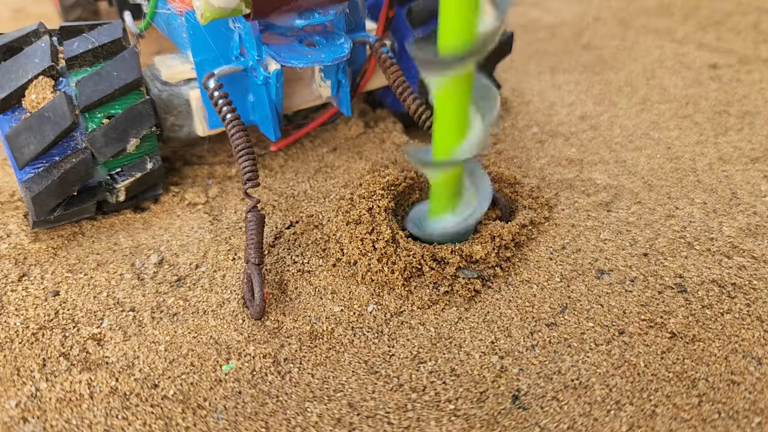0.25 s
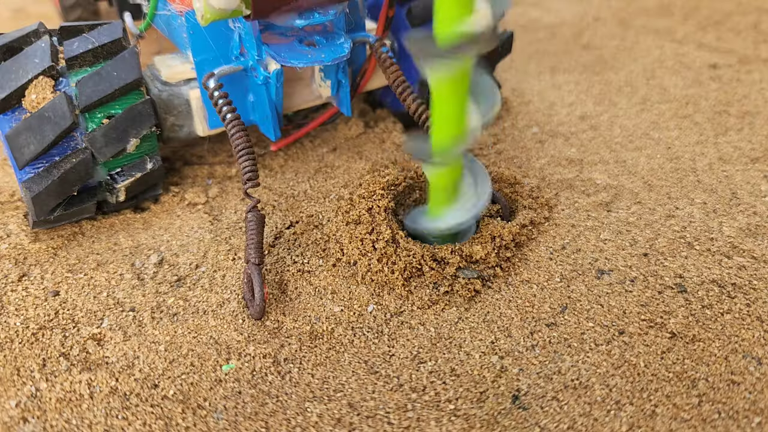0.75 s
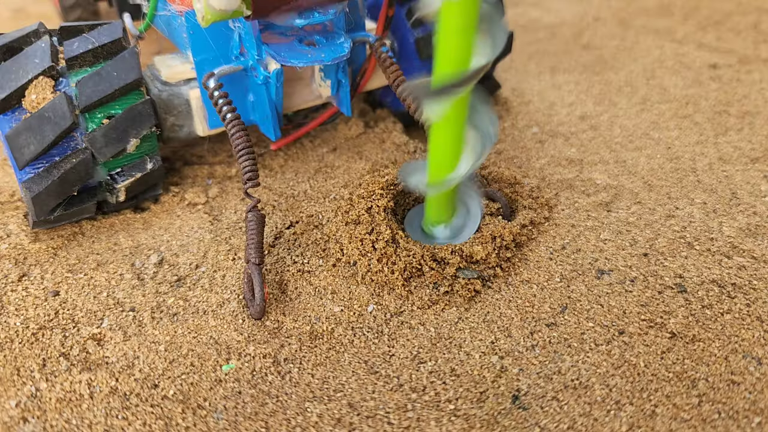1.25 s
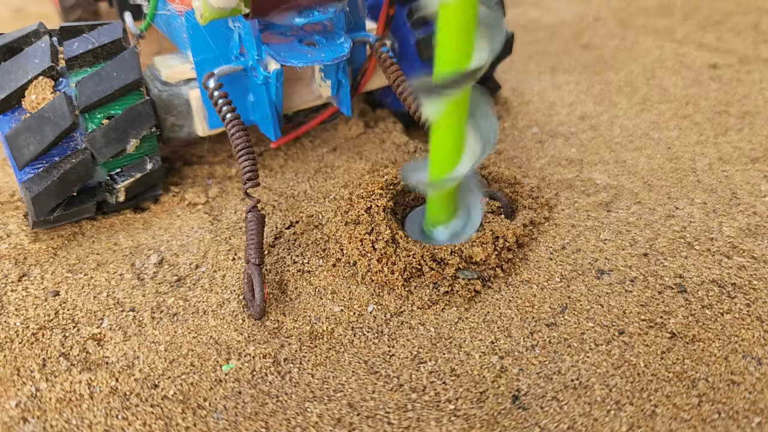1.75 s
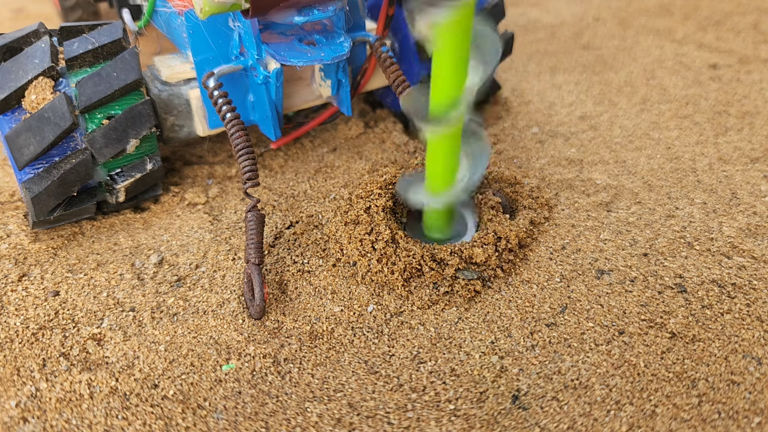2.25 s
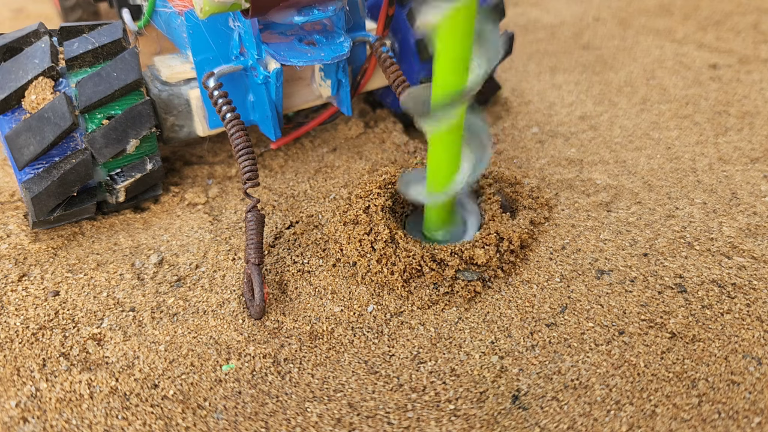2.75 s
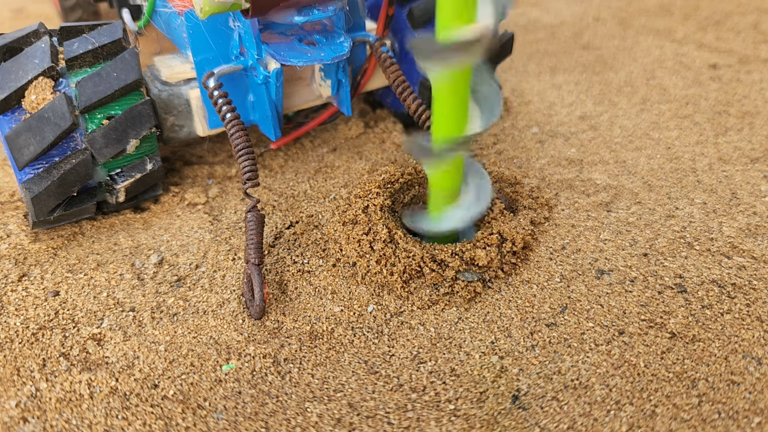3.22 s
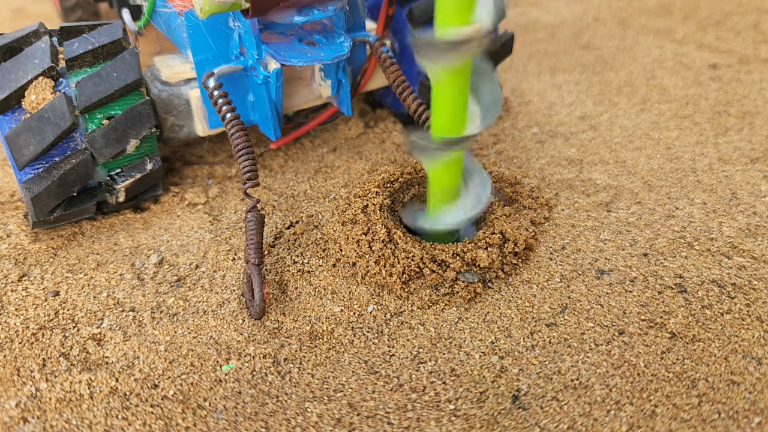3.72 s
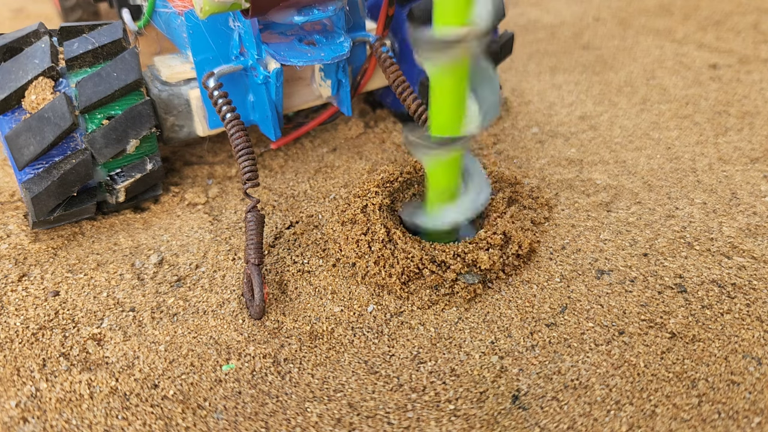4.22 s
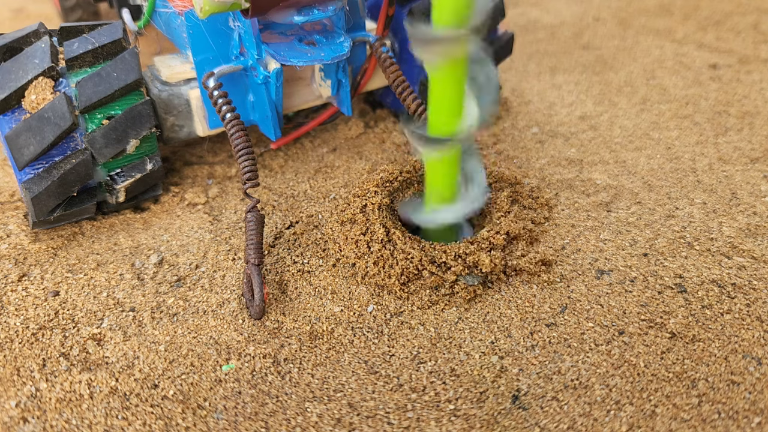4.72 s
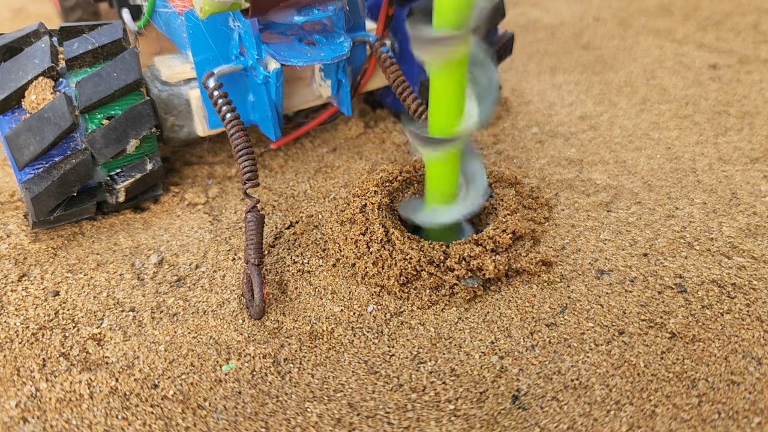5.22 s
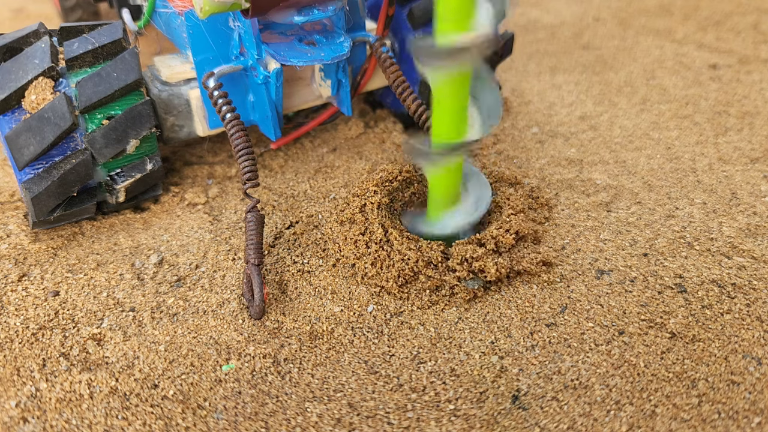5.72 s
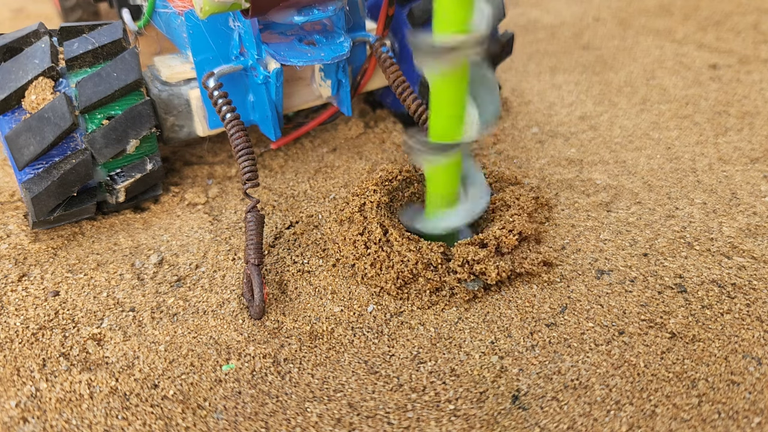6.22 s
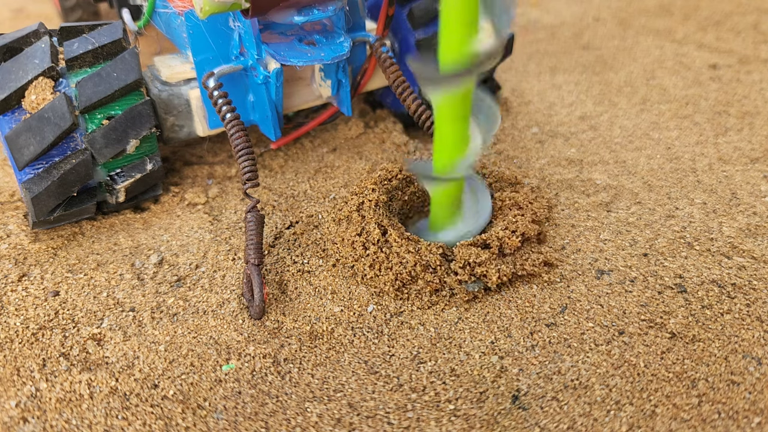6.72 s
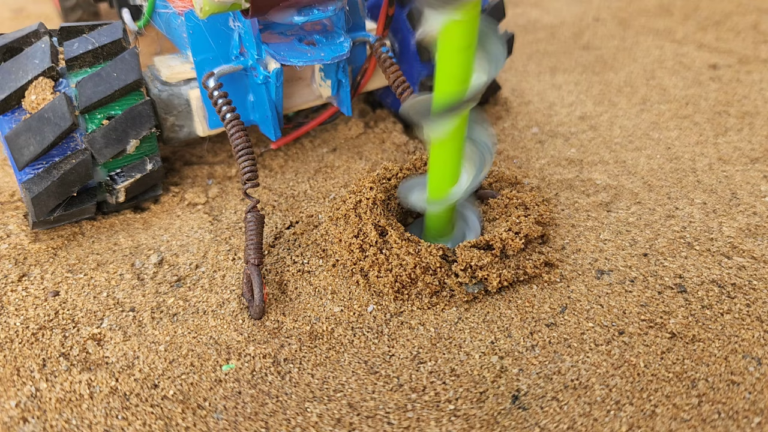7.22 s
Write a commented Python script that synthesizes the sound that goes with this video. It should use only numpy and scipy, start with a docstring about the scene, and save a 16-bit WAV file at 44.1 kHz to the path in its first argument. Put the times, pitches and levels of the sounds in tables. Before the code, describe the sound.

Close up, a little geared motor buzzes and clatters without pause as a toy auger bores into sand.

```python
"""In dry sand, close by, a toy's small DC gear motor turns a plastic auger, slowing a little as it digs. On
every turn of the rotor the loose gears knock into the plastic chassis and excite its modes, and the brushes
scratch and now and then snap with a bright spark; now and then a tooth catches with a clack. The unbalanced
rotor hums underneath, the teeth whine faintly and the frame shudders. Sand crumbles and scrapes round the bit."""
import sys
import numpy as np
from scipy import signal
from scipy.fft import rfft, irfft, next_fast_len
from scipy.io import wavfile

SR = 44100
rng = np.random.default_rng(int(sys.argv[2]) if len(sys.argv) > 2 else 0)


def wav_record(signal):
    """Record a signal, one row per channel, as 16-bit PCM in the file named by sys.argv[1]."""
    frames = np.transpose(np.atleast_2d(signal))
    bounded = np.clip(frames, -1, 1)
    # unit amplitude maps onto the largest positive 16-bit level
    quanta = np.round(bounded * 32767).astype(np.int16)
    wavfile.write(sys.argv[1], SR, quanta)


N = 328986
TIME = np.arange(N) / SR
SECOND_GEAR_RATIO = 7 / 11   # turns of the second gear per rotor turn


def gears(turns, level_db, unevenness, ear_unevenness):
    """Modal superposition: each knock rings the plastic's modes; soft contacts barely reach high ones."""
    # Chassis modes, struck directly. Each row: frequency in Hz, bandwidth in Hz, relative level in dB,
    # left-right difference in dB.
    chassis_modes = [(425, 370, -35.5, 10), (521, 69, -11, 1), (989, 97, -8, 5), (1105, 150, -13, -5),
                     (1404, 127, 0.5, 1.5), (1500, 215, -9, -1.9), (1730, 220, -7, 2),
                     (1851, 144, 0.66, -3), (2073, 80, -7, -8), (3916, 530, -8, 0), (4700, 1080, -10, -1)]
    # Gearbox shell modes, with the same columns; two resonators in series make each swell a moment later.
    shell_modes = [(2485, 370, 2, 5), (2767, 217, 5, -1), (3130, 270, -4.5, 5.5), (3260, 236, -5.5, -9.5)]
    # Antiresonances, where neighbouring modes cancel. Each row: frequency in Hz, width in Hz, depth 0-1.
    antiresonances = [(729, 165, 0.89), (1270, 220, 0.11), (2262, 82, 0.07), (3530, 150, 0)]
    times, sizes, hardness_hz = knocks(turns, rebound_db=-6.0, rebound_s=0.001321)
    body = 0
    for k, (hz, width, db, side_db) in enumerate(chassis_modes + shell_modes):
        chance = rng.standard_normal((len(times), 3)).T
        # the point of contact changes, and with it how each mode is struck and where it radiates
        variety = 1 + unevenness * chance[0] + ear_unevenness * hz / 2000 * chance[1:]
        strengths = sizes * variety / np.sqrt(1 + (hz / hardness_hz) ** 6)
        ring = resonate(np.array([impulses(times, ear) for ear in strengths]), hz, width)
        if k >= len(chassis_modes):
            ring = resonate(ring, hz, width)
        polarity = (-1) ** (k // 2)
        body = body + polarity * from_db(db) * pan(side_db) * ring
    for hz, width, depth in antiresonances:
        body = body - depth * resonate(body, hz, width)
    return from_db(level_db) * body


def knocks(turns, rebound_db, rebound_s):
    """Backlash: loose teeth hit either flank and rebound once. Gives times, sizes and hardness in Hz."""
    # Tooth contacts within a turn. Each row: place in the turn 0-1, relative strength in dB,
    # strength spread in dB, timing spread in ms, hardness as a cutoff in Hz.
    contacts = [(.115, -10, 3.5, 0.24, 2200), (.225, -14.5, 5, 0.31, 2180), (.265, -7.5, 1, .15, 4500),
                (0.306, -8.5, 0, 0.27, 5000), (.395, -14, 4, 0.494, 2620), (.479, -15, 0.5, 0.297, 8000),
                (.64, -12, 2.5, 0.372, 3500), (.69, -2.5, 2.9, 0.249, 4200), (.75, -2, 1.6, .25, 4200),
                (.81, -11.5, 2, 0.292, 3000), (.87, 1, 1.2, .14, 1780), (.975, -6, 1, 0.13, 1620)]
    catch_s, catch_sizes = catches(turns, share=.2, catch_db=.5, clack_db=20.5)
    groups = [(catch_s, catch_sizes, np.full(len(catch_s), 4130))]   # hardness of a catch in Hz
    for place, db, spread_db, spread_ms, hardness_hz in contacts:
        times, sizes = each_turn(turns, place, spread_db, spread_ms, gear_db=0.4)
        # a caught tooth skips its ordinary contacts
        free = (catch_sizes == 0) | (times < catch_s - .0024) | (times > catch_s + .0012)
        groups.append((times, free * sizes * from_db(db), np.full(len(times), hardness_hz)))
    times, sizes, hardness = np.hstack(groups)
    rebounds = times + rebound_s * rng.uniform(.3, 1.679, len(times))
    flank = rng.choice([-1, 1], 2 * len(times))
    return np.r_[times, rebounds], flank * np.r_[sizes, sizes * from_db(rebound_db)], np.tile(hardness, 2)


def catches(turns, share, catch_db, clack_db):
    """Stick and release: a tooth catches and lets go hard, on random turns and at the listed clacks."""
    # Catches that stand out as clacks. Each row: time in seconds, relative level in dB.
    clacks = [(0.3341, -15), (0.4772, -16), (0.584, -14), (0.617, -20), (0.8337, -16), (0.8697, -17),
              (1.1209, -17), (1.2637, -21), (1.4262, -16), (1.5507, -14), (1.5873, -14.5), (1.784, -16),
              (1.8202, -16), (1.927, -17), (2.5731, -13.5), (2.6263, -17.5), (3.021, -16.5),
              (3.3619, -16.5), (3.47, -15.5), (3.5766, -17.5), (3.686, -14), (3.7766, -15.5), (3.8638, -16),
              (4.17, -15), (4.4039, -16.5), (4.817, -18), (4.9603, -15), (5.015, -16), (5.1424, -18),
              (5.232, -14.5), (5.25, -19), (5.9528, -16.5), (6.0072, -17), (6.1511, -15), (6.186, -17.5),
              (6.206, -14.5), (6.2614, -17), (6.566, -16), (6.873, -15.5), (6.9817, -17), (7.434, -15)]
    times, sizes = each_turn(turns, place=.715, spread_db=1, spread_ms=0.343, gear_db=-0.9)
    caught = rng.random(len(times)) < share
    sizes = caught * sizes * from_db(catch_db)
    clack_s, db = np.transpose(clacks)
    nearest = np.abs(times[:, None] - clack_s).argmin(axis=0)   # a clack is the catch of its turn
    times[nearest], sizes[nearest] = clack_s, from_db(db + clack_db)
    return times, sizes


def each_turn(turns, place, spread_db, spread_ms, gear_db):
    """Eccentricity: the second gear presses a once-a-turn contact harder and softer. Gives times, sizes."""
    at = np.arange(int(turns[-1])) + place
    timing, strength = rng.standard_normal((len(at), 2)).T
    pressure = np.sin(2 * np.pi * SECOND_GEAR_RATIO * at)
    times = np.interp(at, turns, TIME) + spread_ms * timing / 1000
    return times, from_db(spread_db * np.clip(strength, -2, 1.7) + gear_db * pressure)


def brushes(turns, level_db, floor_db, sparks_per_s, spark_db, spark_spread_db):
    """Sliding friction: brushes cross the commutator gaps in decaying noise bursts, with tiny sparks."""
    # Scratches within a turn. Each row: place in the turn 0-1, relative level in dB, decay time in ms,
    # strength spread in dB, timing spread in ms.
    scratches = [(.195, -12.5, 6, 10.5, 0.4), (.258, 1, 0.74, 5.5, 0.18), (.31, -4, 5, 5, 0.32),
                 (0.459, 0.5, 5.5, 4, 0.25), (.52, -4.5, 3.6, 3.5, 0.4), (0.69, -3.5, 3.4, 3, 0.4)]
    # Spectrum of the brush noise. Each row: frequency in Hz, relative spectral density in dB.
    spectrum = [(100, -34), (2000, -23), (3800, -3), (4650, 4), (6000, -0.5), (7500, -4.5), (8600, 2.5),
                (9400, -2.5), (10300, -3.5), (11500, 0), (13300, 2), (15400, -0.5), (15900, -22)]
    power = from_db(floor_db) ** 2
    for place, db, decay_ms, spread_db, spread_ms in scratches:
        times, sizes = each_turn(turns, place, spread_db, spread_ms, gear_db=1.5)
        retention = np.exp(-2000 / (decay_ms * SR))   # power decays twice as fast as amplitude
        power = power + signal.lfilter([1], [1, -retention], impulses(times, (sizes * from_db(db)) ** 2))
    sizes = rng.choice([-1, 1], N) * from_db(spark_spread_db * np.minimum(rng.standard_normal(N), 2))
    sparks = (rng.random(N) < sparks_per_s / SR) * sizes * (1 + 1.26 * rng.standard_normal((2, N)))
    crackle = from_db(spark_db) * rms_one(highpass(sparks, hz=10500))
    friction = rng.standard_normal((2, N))
    return from_db(level_db) * pan(1.8) * colour(np.sqrt(power) * (friction + crackle), spectrum)


def rotor_hum(turns, place, lead, flutter, wobble):
    """Forced vibration: the unbalanced rotor pushes the frame slowly, then thumps it, once a turn."""
    # Harmonics of the rotation. Each row: multiple of the turn rate, level in dB.
    harmonics = [(2, -66), (3, -49), (4, -53), (5, -60), (6, -65), (7, -47.8), (8, -54.5), (9, -54.5),
                 (10, -56), (11, -57.5), (12, -63), (13, -62), (14, -63), (15, -67), (16, -60), (17, -52),
                 (18, -52.5), (19, -56), (20, -53.5), (24, -55), (25, -46.5), (26, -56), (27, -53),
                 (28, -53), (30, -50), (34, -53)]
    load = np.sin(2 * np.pi * SECOND_GEAR_RATIO * turns) + 0.19 * drift(48)
    hum = 0
    for order, db in harmonics:
        looseness = np.clip((order - 4) / 10, .05, 1)   # high orders follow the gear load most
        waver = 1 + looseness * (wobble * load + flutter * drift(25))
        cycles = order * (turns - place) - lead / order   # low orders come early in the turn
        hum = hum + from_db(db) * waver * np.cos(2 * np.pi * cycles)
    return np.sqrt(2) * hum * pan(0.6)


def mesh_whine(turns, waver_rad):
    """Periodic meshing: the teeth sing faint tones that follow the speed and waver in phase."""
    # Gear mesh tones. Each row: frequency in Hz at the mean speed, level in dB.
    tones = [(1259, -52.5), (1839, -48), (2206, -53), (2493, -45)]
    clock = turns * TIME[-1] / turns[-1]
    return np.sqrt(2) * sum(from_db(db) * np.sin(2 * np.pi * hz * clock + waver_rad * drift(20))
                            for hz, db in tones)


def crumbling_sand(level_db, grains_per_s, stereo_width):
    """Shot noise: countless grains rub and tumble round the bit as the auger lifts them."""
    # Spectrum of the crumbling. Each row: frequency in Hz, relative spectral density in dB.
    spectrum = [(30, -24), (300, -13.5), (700, -5), (1500, -9), (1850, 5), (2200, 4), (2650, 7),
                (3200, 3.5), (3750, 0.5), (4800, -7), (8000, -18), (15000, -10)]
    grains = grain_impacts(grains_per_s) * (1 + stereo_width * rng.standard_normal((2, N)))
    return from_db(level_db) * colour(grains, spectrum)


def spark_snaps(level_db, low_hz):
    """Electrical discharge: now and then a brush sparks with a short bright snap."""
    # Loud brush sparks. Each row: time in seconds, relative level in dB.
    snaps = [(0.8085, -13), (1.6366, -25), (1.8826, -22), (2.2588, -22), (2.7436, -13), (4.2692, -13),
             (4.7586, -24), (5.3536, -13), (5.7503, -20), (6.575, -19)]
    times, db = np.transpose(snaps)
    cracks = scatter(impulses(times, from_db(db + level_db)), t60=0.0046)
    return pan(2) * highpass(cracks, low_hz)


def sand_scrapes(grains_per_s, hz, width_hz):
    """Granular friction: the auger bites into firmer sand in brief swells of band-limited noise."""
    # Bites of the auger. Each row: time of the peak in seconds, length in seconds, level in dB.
    bites = [(.29, .06, -43), (.62, .05, -45), (.86, 0.073, -42), (1.82, .06, -40), (2.81, 0.099, -41),
             (5.31, .08, -41)]
    swell = sum(from_db(db) * np.exp(-(2 * (TIME - peak_s) / length) ** 2) for peak_s, length, db in bites)
    grains = scatter(grain_impacts(grains_per_s), t60=.003)
    return swell * rms_one(resonate(resonate(grains, hz, width_hz), hz, width_hz))


def frame_shudder(level_db, stereo_width):
    """Random vibration: the whole toy trembles against the drag of the bit."""
    # Spectrum of the low trembling. Each row: frequency in Hz, relative spectral density in dB.
    spectrum = [(20, -20), (36, -16), (50, -1), (66, 0.5), (85, -9), (140, -11), (200, -7), (260, 0),
                (500, 2), (720, -6), (1200, -26)]
    mid, side = rng.standard_normal((2, N))
    return from_db(level_db) * colour(mid + stereo_width * side * [[1], [-1]], spectrum)


def reflections(x, t60, changes_per_s, count):
    """Multipath scattering off ground and toy: the turning and trembling keep changing the paths."""
    return sum(drift(changes_per_s) * scatter(x, t60) for _ in range(count)) / np.sqrt(count)


def scatter(x, t60):
    """Diffuse decay: unit-energy tails, different at each ear, fall 60 dB in t60 seconds."""
    t = np.arange(SR // 4) / SR
    tails = rng.standard_normal((2, len(t))) * from_db(-60 * t / t60)
    tails /= np.linalg.norm(tails, axis=1, keepdims=True)
    return signal.fftconvolve(np.atleast_2d(x), tails, axes=1)[:, :N]


def resonate(x, hz, width_hz):
    """Damped resonance with unit gain at its peak."""
    radius = np.exp(-np.pi * width_hz / SR)
    feedback = [1, -2 * radius * np.cos(2 * np.pi * hz / SR), radius ** 2]
    return signal.lfilter(np.array([1, 0, -1]) * (1 - radius ** 2) / 2, feedback, x)


def colour(x, spectrum):
    """Spectral shaping by a curve through (Hz, dB) points, scaled to rms 1."""
    hz, db = np.transpose(spectrum)
    size = next_fast_len(N)
    bin_hz = np.maximum(np.arange(size // 2 + 1) * SR / size, 1)
    gain = from_db(np.interp(np.log(bin_hz), np.log(hz), db))
    return rms_one(irfft(rfft(x, size) * gain, size)[..., :N])


def highpass(x, hz):
    """Second-order high-pass filter."""
    return signal.sosfilt(signal.butter(2, hz, "high", fs=SR, output="sos"), x)


def impulses(times, sizes):
    """Impulse train, each impulse shared between neighbouring samples."""
    inside = (times > 0) & (times < (N - 2) / SR)
    at, part = np.divmod(times[inside] * SR, 1)
    at, sizes = at.astype(int), sizes[inside]
    return np.bincount(at, sizes * (1 - part), N) + np.bincount(at + 1, sizes * part, N) + 1e-18


def grain_impacts(per_s):
    """Random point process: independent impulses of random size."""
    return (rng.random(N) < per_s / SR) * rng.standard_normal(N)


def drift(per_s):
    """Slow random modulation with per_s new values a second, at rms 1."""
    knots = np.arange(0, N / SR + 1, 1 / per_s)
    return rms_one(np.interp(TIME, knots, rng.standard_normal(len(knots))))


def pan(db):
    """Left and right gains for an interaural level difference."""
    return from_db(np.array([[db], [-db]]) / 2)


def rms_one(x):
    """Normalisation to rms 1."""
    return x / np.sqrt(np.mean(x ** 2) + 1e-20)


def from_db(db):
    """Decibels to amplitude gain."""
    return 10 ** (np.asarray(db) / 20)


def scene():
    """Superposition: one rotation times all the motor's sounds; the toy sits a little to the left."""
    # Rotor speed. Each row: time in seconds, turns per second.
    speed = [(0.0, 55.89), (0.55, 56.0), (0.9, 55.8), (1.25, 55.89), (2.0, 55.76), (2.8, 55.81),
             (3.4, 55.71), (4.2, 55.67), (5.0, 55.47), (5.9, 55.52), (6.6, 55.39), (7.15, 55.24),
             (7.46, 55.42)]
    turns = np.cumsum(np.interp(TIME, *np.transpose(speed))) / SR
    knocking = gears(turns, level_db=6.0, unevenness=0.3, ear_unevenness=0.18)
    hum = rotor_hum(turns, place=.935, lead=14, flutter=.09, wobble=.2)
    whine = mesh_whine(turns, waver_rad=.55)
    sand = crumbling_sand(level_db=-36.0, grains_per_s=9000, stereo_width=1.0)
    left, right = knocking + hum + whine + sand
    direct = np.array([left, np.interp(TIME - .135e-3, TIME, right)])   # the right ear lags by 0.135 ms
    scratching = brushes(turns, level_db=-40.5, floor_db=-15.5,
                         sparks_per_s=1800, spark_db=-4.5, spark_spread_db=2.6)
    reflected = from_db(-10.0) * reflections(knocking, t60=0.082, changes_per_s=11, count=6)
    snaps_and_scrapes = spark_snaps(level_db=11, low_hz=7000) + sand_scrapes(grains_per_s=1000, hz=4200, width_hz=1300)
    return direct + scratching + reflected + snaps_and_scrapes + frame_shudder(level_db=-50.0, stereo_width=0.23)


def record(dry):
    """Band limiting: a steep low-pass filter cuts the treble above 15.9 kHz."""
    return signal.sosfilt(signal.ellip(12, .1, 90, 15900, fs=SR, output="sos"), dry)


dry = scene()
out = record(dry)
wav_record(out)
```